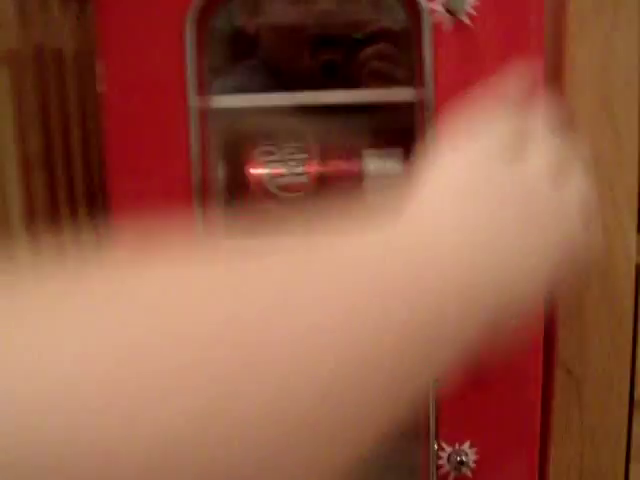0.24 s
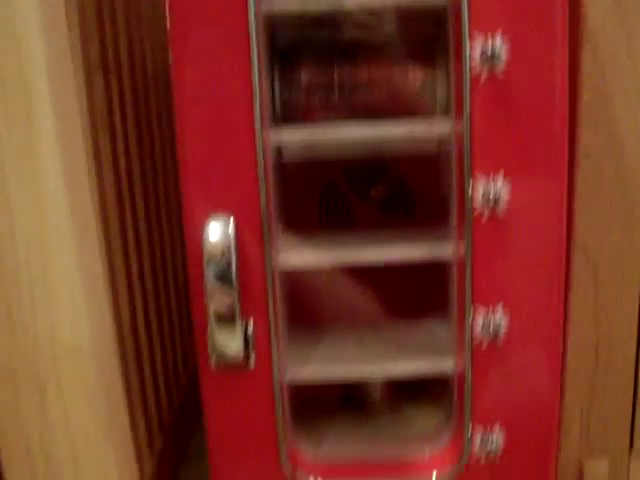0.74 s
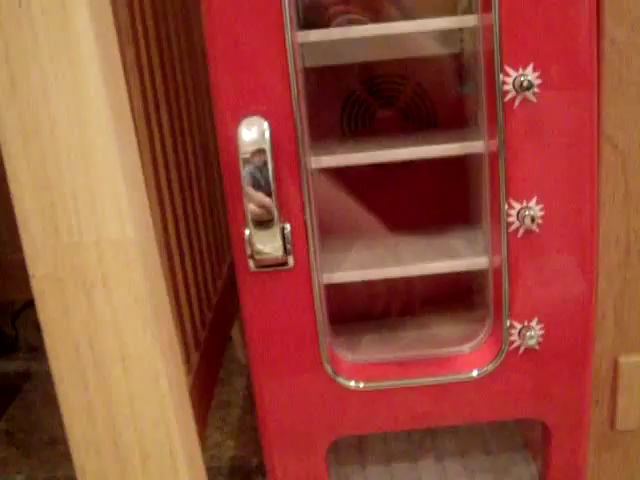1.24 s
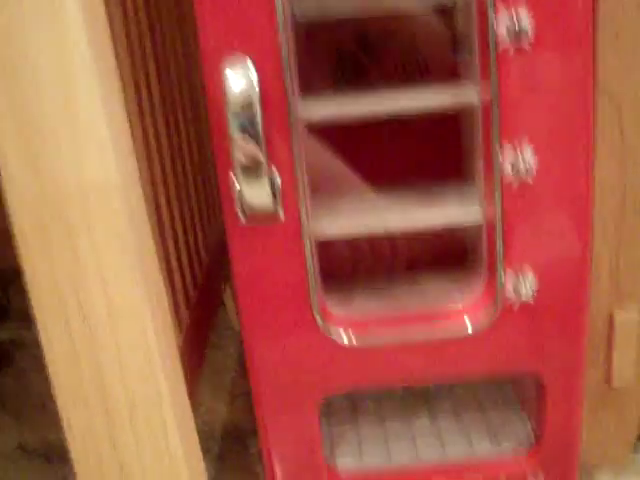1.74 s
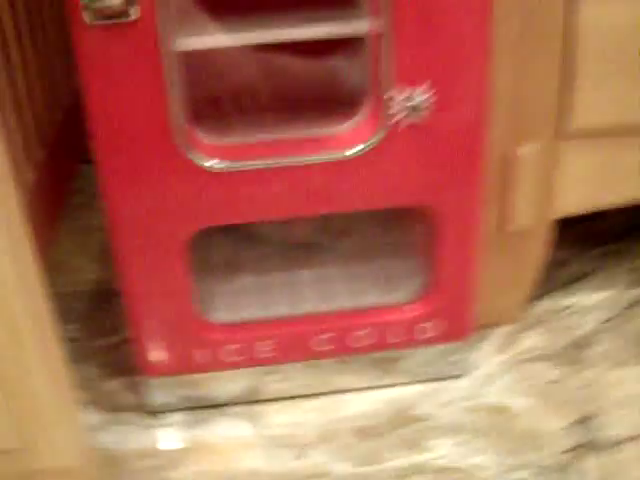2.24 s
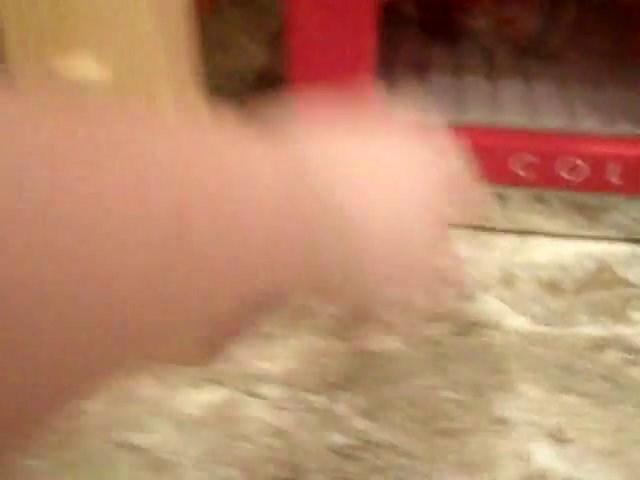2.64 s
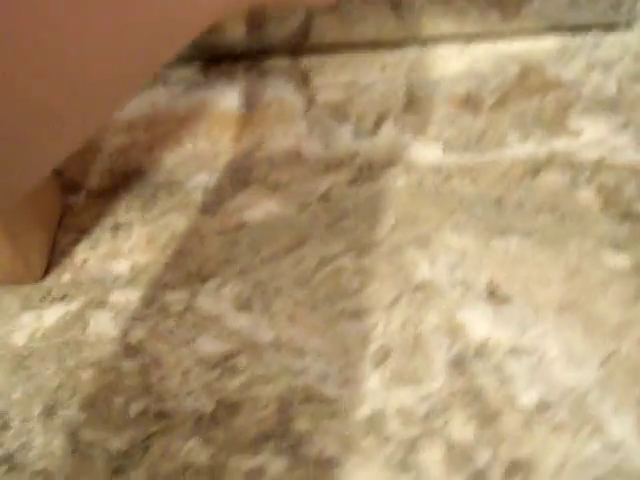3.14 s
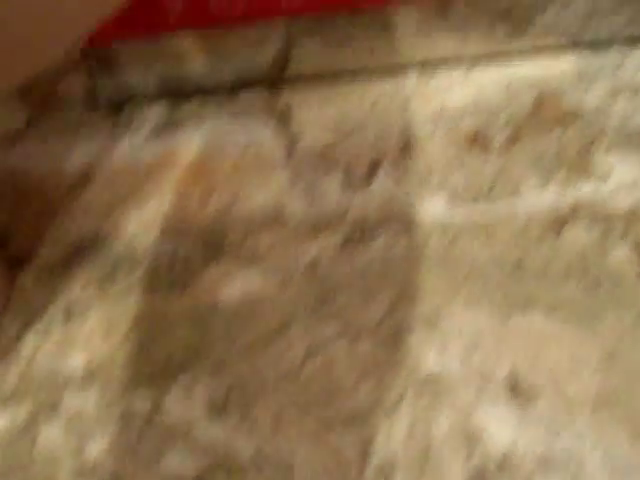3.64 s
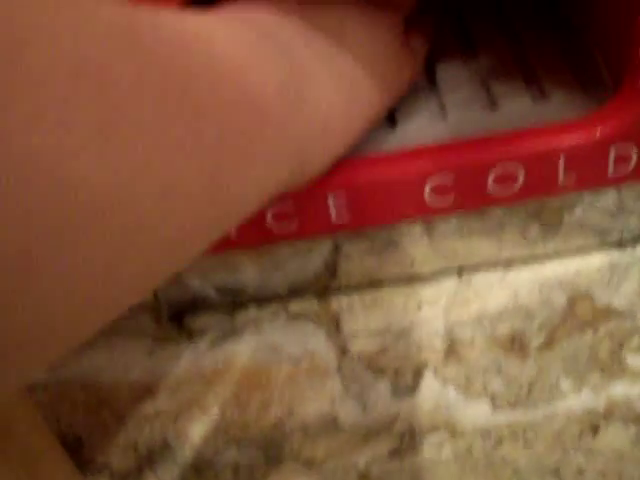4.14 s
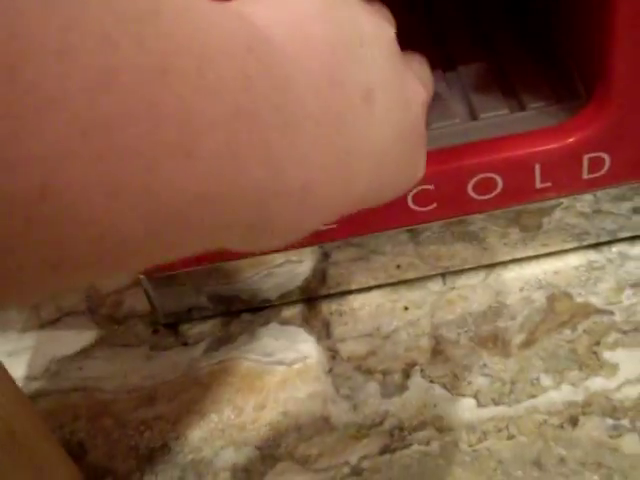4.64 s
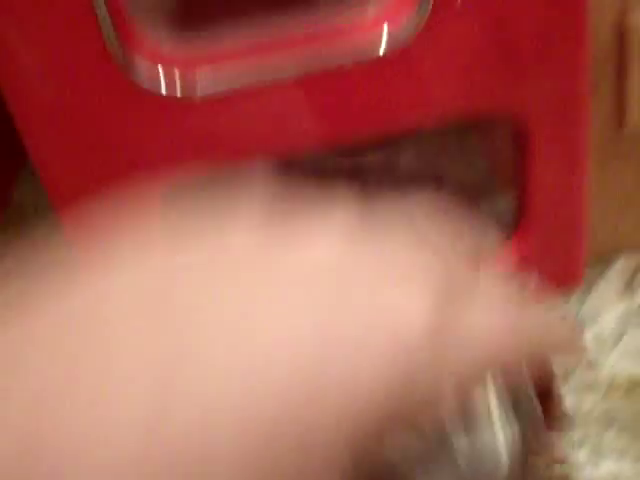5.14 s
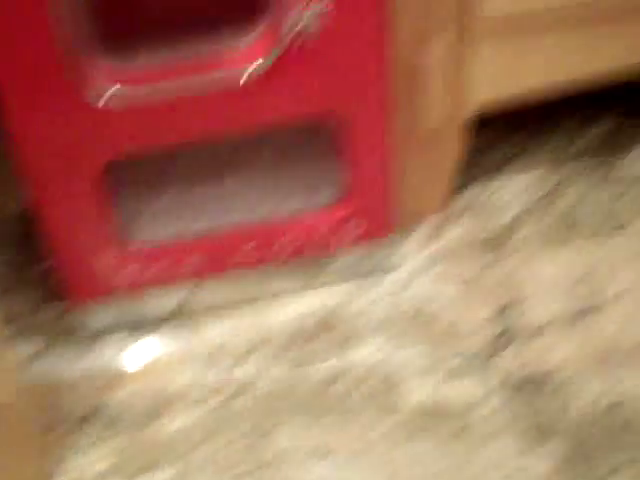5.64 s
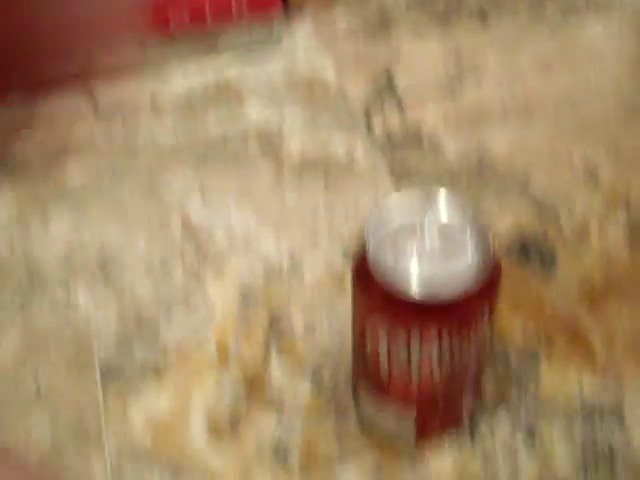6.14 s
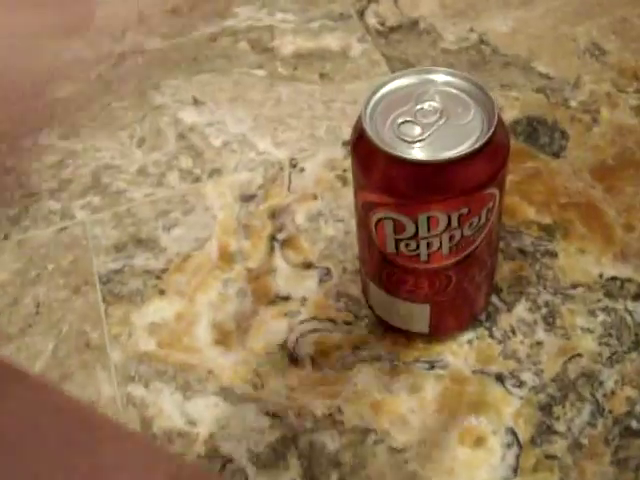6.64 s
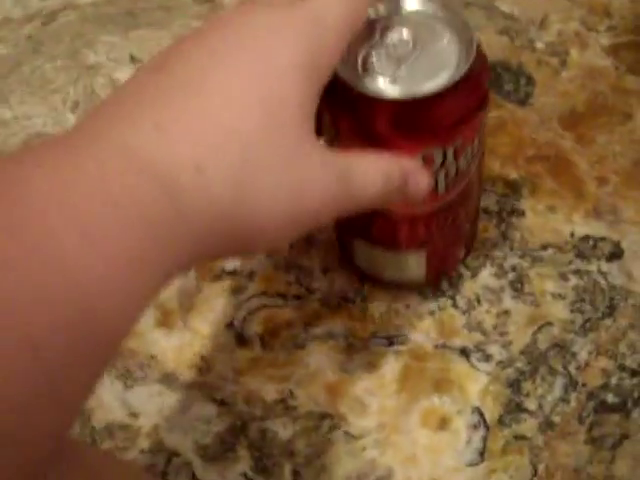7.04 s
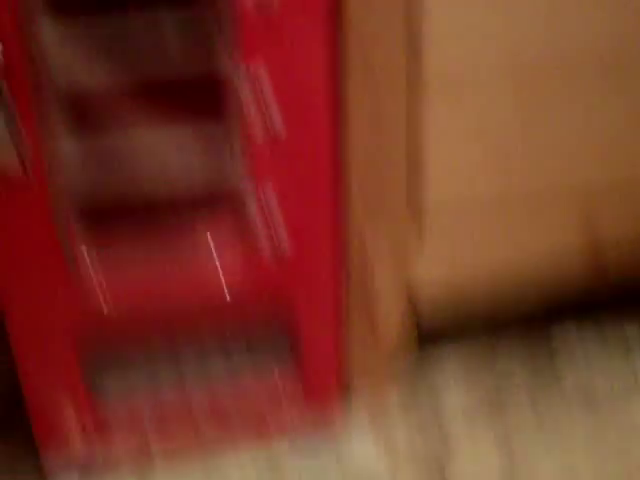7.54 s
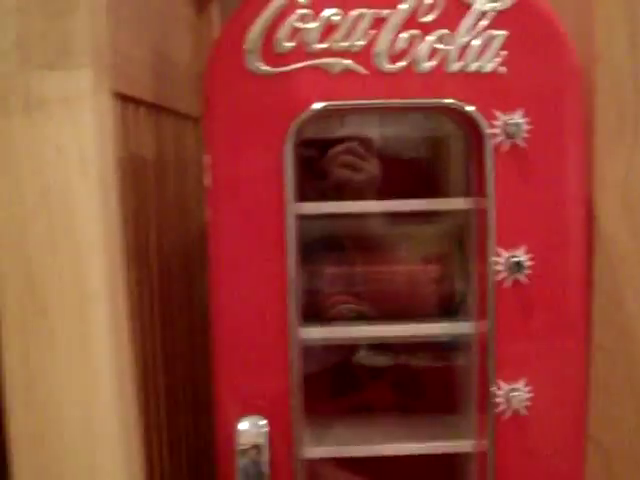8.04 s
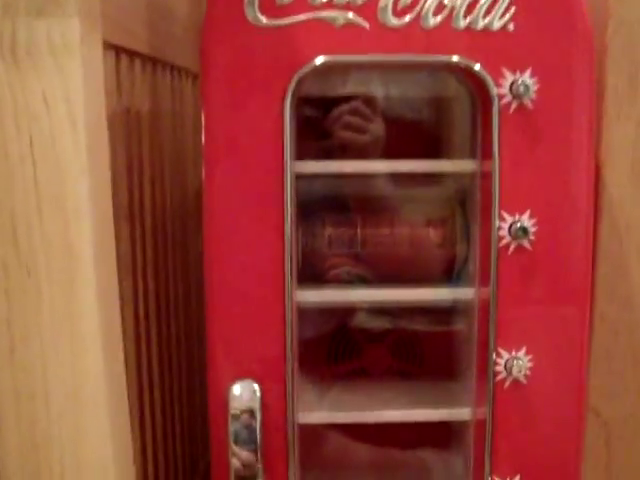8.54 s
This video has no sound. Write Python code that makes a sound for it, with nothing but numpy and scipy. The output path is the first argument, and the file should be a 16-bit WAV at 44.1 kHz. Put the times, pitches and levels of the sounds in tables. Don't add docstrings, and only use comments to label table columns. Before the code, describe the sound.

A cooling fan hums steadily around a low 290 Hz tone with soft airy wash, close up in a small, slightly echoing room. Light ticks at 0.1-0.3 s lead into a dense tumble from 0.37 to 0.85 s: a full can booms down plastic shelves with hollow, cracking, clipped blows. After a gap, it thunks into the tray at 1.26 s, bouncing and settling by 1.45. Quiet until 2.87, when a hand knocks the shell; scattered dull bumps and skin rubs continue to 4.1. Firmer tugging knocks run 4.45-5.0, then a loud clattering bang at 5.1 frees the can. At 5.55 it strikes stone with a bright, short metallic ring, rocks and seats by 5.66. A deep camera bump comes at 6.31. From 7.0 to 7.4 the rim clicks, scrapes and chirps as it lifts. Faint rustle and fan hum finish to 8.8 s.

```python
import sys
import numpy as np
from scipy import signal
from scipy.fft import rfft, irfft, next_fast_len
from scipy.io import wavfile
from scipy.ndimage import uniform_filter1d

SR = 44100
rng = np.random.default_rng(int(sys.argv[2]) if len(sys.argv) > 2 else 0)


def to_wav(sig):
    pcm = np.clip(np.atleast_2d(sig), -1, 1) * 32767
    pcm = np.round(pcm).astype(np.int16)
    wavfile.write(sys.argv[1], SR, pcm.T)


def volts_from_db(level):
    exponent = np.asarray(level, float) / 20
    return 10 ** exponent


N = 387947


def evened(x):
    return x / np.sqrt(np.mean(x ** 2) + 1e-20)


def read(points, hz):
    f, value = np.transpose(points)
    return np.interp(np.log(hz + 1), np.log(f + 1), value)


def coloured(x, points):
    size = next_fast_len(len(x))
    gain = volts_from_db(read(points, np.fft.rfftfreq(size, 1 / SR)))
    return irfft(rfft(x, size) * gain, size)[:len(x)]


def along(rows, column):
    rows = np.asarray(rows)
    return np.interp(np.arange(N) / SR, rows[:, 0], rows[:, column])


def drift(rate):
    steps = rng.standard_normal(int(N / SR * rate) + 2)
    return evened(np.interp(np.arange(N) / SR * rate, np.arange(len(steps)), steps))


def swells(rows, column):
    t = np.arange(N // 64 + 2) * 64 / SR
    slow = np.zeros(len(t))
    for row in rows:
        away = np.maximum((row[0] - t) / row[1], (t - row[0]) / row[2])
        slow += volts_from_db(row[column] - 20 * away)
    return np.interp(np.arange(N) / SR, t, slow)


def grit(per_s, spread_db):
    size = volts_from_db(spread_db * np.minimum(rng.exponential(1, N), 4)) * rng.standard_normal(N)
    return evened(size * (rng.random(N) < per_s / SR))


def patchy(x, depth_db):
    z = signal.stft(x, nperseg=512)[2]
    patches = uniform_filter1d(rng.standard_normal(z.shape), size=9, axis=0)
    patches = uniform_filter1d(patches, size=14, axis=1)
    return signal.istft(z * volts_from_db(depth_db * evened(patches)), nperseg=512)[1][:N]


def puffs(s, db, t60):
    spikes = np.zeros(N)
    spikes[np.round(np.asarray(s) * SR).astype(int) + 30] = volts_from_db(db)
    fading = signal.lfilter([1], [1, -10 ** (-3 / (t60 * SR))], spikes)
    return uniform_filter1d(fading, size=60)


def ring(x, hz, t60):
    w = 2 * np.pi * hz / SR
    r = 10 ** (-3 / (t60 * SR))
    return signal.lfilter([0, np.sin(w)], [1, -2 * r * np.cos(w), r * r], x)


def shaken(push, modes):
    return sum(volts_from_db(db) * ring(push, hz, t60) for hz, db, t60 in modes)


def struck(s, db, modes, contact_s, scatter_db, detune, focus_hz=None, damping=1):
    hz, mode_db, t60 = np.transpose(modes)
    chance = rng.standard_normal((len(s), 2, len(modes)))
    t = np.arange(SR // 2)[:, None] / SR
    out = np.zeros(N + SR)
    share_db = db[:, None] + mode_db + scatter_db * chance[:, 0]
    if focus_hz is not None:
        share_db = share_db - 11.7 * abs(np.log2(hz / focus_hz[:, None]))
    share = volts_from_db(share_db) * (-1) ** np.arange(len(modes))
    shifts = 1 + detune * chance[:, 1]
    for start, levels, shift, damp in zip(s, share, shifts, damping * np.ones(len(s))):
        fade = np.exp(-np.log(1000) * damp * t / t60) * (1 - t / t[-1])
        out[round(start * SR):][:len(t)] += (np.sin(2 * np.pi * t * hz * shift) * fade) @ levels
    pad = np.hanning(int(contact_s * SR) + 3)
    return signal.oaconvolve(out, pad / pad.sum())[:N]


# frequency in Hz, t60 in s.
ROOM_DECAY = [(60, 0.57), (250, 0.42), (1000, 0.45), (4000, 0.4)]


def room(x):
    taps = np.zeros(SR)
    at = np.arange(200, SR - 20, 20)
    taps[at + rng.integers(0, 20, len(at))] = rng.choice([-1., 1.], len(at))
    hz, t, z = signal.stft(taps, SR, nperseg=256)
    dying = volts_from_db(-60 * t / read(ROOM_DECAY, hz)[:, None])
    tail = signal.istft(z * dying, SR, nperseg=256)[1]
    return signal.fftconvolve(x, tail / np.linalg.norm(tail))[:N]


# frequency in Hz, level in dB per Hz.
AIR_WASH = [(20, -14), (49, -6.5), (110, -17.5), (183, -0.5), (230, -3), (294, -1), (390, -9), (600, -8),
            (1300, -11), (2100, -11), (3000, -25), (4000, -27), (5500, -22.5)]
# frequency in Hz, level in dB, width in Hz.
FAN_TONES = [(292, -41.5, 1.938), (315, -51.5, 4.2), (609, -58, 4), (47.7, -53, 6.8), (120, -57, 14),
             (180, -52.5, 3.4), (357, -60, 2.7), (1320, -55.5, 4.8)]
# time in s, level in dB.
FAN_DISTANCE = [(0.0, -2.5), (8.8, -3)]


def fan():
    t = np.arange(N) / SR
    wash_level = volts_from_db(-44 + drift(2.485))
    wash = wash_level * evened(coloured(rng.standard_normal(N), AIR_WASH))
    tones = np.zeros(N)
    for hz, db, width in FAN_TONES:
        level = volts_from_db(db + 2.0 + 0.3 * drift(22))
        cycles = hz * t + np.cumsum(width * drift(14)) / SR
        tones += level * np.sin(2 * np.pi * cycles)
    return wash + volts_from_db(along(FAN_DISTANCE, column=1)) * tones


# start in s, level in dB, pitch in Hz.
CAMERA_BUMPS = [
    (6.259, -30, 58.3),
    (6.283, -21, 68.4),
    (6.31, -6.5, 52.5),
    (6.513, -28, 90),
    (7.809, -41, 49),
]


def thumps():
    out = np.zeros(N)
    t = np.arange(4000) / SR
    for s, db, hz in CAMERA_BUMPS:
        turns = 2.73 * (1 - np.exp(-t * hz / 1.84))
        shape = -np.sin(2 * np.pi * turns) * np.minimum(t / 0.0008, 1) * np.exp(-t * hz / 0.64)
        out[round(s * SR):][:len(t)] += volts_from_db(db + 3.5) * shape
    return out


# peak in s, rise in s, fall in s, hiss in dB, brush in dB.
STROKES = [(.15, 0.39, 0.096, -59.5, -39), (.54, 0.092, 0.24, -41, -10.5), (.95, 0.35, 0.54, -66, -49.5),
           (1.35, 0.16, 0.21, -70, -26), (2.45, 0.45, 0.2, -39.5, -42.5), (2.7, 0.47, 0.068, -53, -80),
           (3.06, 0.14, 1, -43, -53.5), (3.53, 0.97, 0.54, -46, -32.5), (3.9, 0.27, 0.46, -49.5, -43),
           (4.31, 0.36, 0.89, -47.5, -34), (4.66, 0.32, 0.047, -38.5, -48.5),
           (4.85, 0.22, 0.15, -41, -25.5), (5.02, 0.15, 0.15, -38.5, -42.5), (5.95, 1, 0.97, -49, -66.5),
           (6.37, 0.43, 0.13, -44, -42.5), (6.8, 0.13, 0.9, -46.5, -82), (7.25, 0.066, 0.32, -45, -36),
           (7.83, 0.22, 0.19, -55, -33), (8.5, 0.62, 1, -72.5, -44.5)]
# time in s, level in dB.
SHAKE = [(0.0, -54), (0.32, -35), (0.56, -28.5), (0.8, -37), (1.2, -49), (1.35, -39), (1.9, -62.5),
         (2.4, -57.5), (2.91, -70), (3.97, -51), (4.4, -49), (4.66, -24.5), (5.0, -45), (5.9, -56),
         (6.37, -43.5), (7.1, -71), (8.1, -50), (8.8, -51)]
# frequency in Hz, level in dB per Hz.
HISS_COLOUR = [(800, -19.5), (2000, -20), (3000, 3), (4500, -1.5), (5600, 2.5)]
# frequency in Hz, level in dB per Hz.
DULL_COLOUR = [(200, -16), (400, -2), (1000, -4.5), (2000, -7.5), (3500, -23.5)]
# frequency in Hz, level in dB per Hz.
SHAKE_COLOUR = [(25, -15), (50, 3.5), (110, 13), (170, -12.5), (300, -50)]


def rustle():
    rest_hiss_db, rest_brush_db = -59, -46.5
    grains = patchy(volts_from_db(2.3 * drift(22)) * grit(6000, 1.6), 2.67)
    hiss_level = volts_from_db(5.5) * (swells(STROKES, column=3) + volts_from_db(rest_hiss_db))
    brush_level = volts_from_db(-7.0) * (swells(STROKES, column=4) + volts_from_db(rest_brush_db))
    hiss = hiss_level * evened(coloured(grains, HISS_COLOUR))
    brush = brush_level * evened(coloured(grains, DULL_COLOUR))
    rumble = volts_from_db(along(SHAKE, column=1)) * evened(coloured(rng.standard_normal(N), SHAKE_COLOUR))
    return hiss + brush + rumble


# start in s, level in dB, pitch in Hz, length in s.
SLIPS = [
    (2.937, -36.5, 2350, 0.037),
    (4.452, -34, 4720, 0.017),
    (5.054, -5, 393, 0.023),
    (7.06, -10, 2950, 0.0061),
    (7.067, -34, 400, 0.043),
    (7.249, -34, 386, 0.029),
    (7.34, -19, 2710, 0.014),
    (7.348, -36, 392, .04),
]


def squeaks():
    out = np.zeros(N)
    for (s, db, hz, length), bend in zip(SLIPS, rng.standard_normal(len(SLIPS))):
        t = np.arange(round(length * SR)) / SR
        tone = np.sin(2 * np.pi * hz * t * (1 + 0.036 * bend * t / length))
        out[round(s * SR):][:len(t)] += volts_from_db(db) * np.sin(np.pi * (t / length) ** 0.78) ** 2 * tone
    return out


def can(rows, modes, knock_db, spread):
    s, db, upper_db, drag_db, drag_s = np.transpose(rows)
    drag, bright = np.zeros((2, N))
    for start, level, lift, length in zip(s, drag_db, upper_db, drag_s):
        swell = volts_from_db(level) * np.hanning(round(length * SR))
        drag[round(start * SR):][:len(swell)] += swell
        bright[round(start * SR):][:len(swell)] += volts_from_db(lift) * swell
    rim = grit(3000, 3.2)
    scrape = drag * rim
    bright_scrape = bright * rim
    main = struck(s, db + 2.5, modes[:1], .0002, .5, .002)
    main += shaken(volts_from_db(-24) * scrape, modes[:1])
    cluster = struck(s, db + upper_db - 8.0, 3 * modes[1:], .0001, 0.8, spread)
    cluster += shaken(volts_from_db(-31.0) * bright_scrape, modes[1:])
    cluster += coloured(volts_from_db(-8.0) * bright_scrape, [(400, -20)] + CRACK_COLOUR)
    dull = struck(s, db + knock_db - 9.0, PANEL_MODES[3:] + TRAY_MODES[:2], 0.00044, 1.2, 0.038)
    dull += shaken(volts_from_db(-43.5) * scrape, PANEL_MODES[4:])
    return main + cluster + dull


# start in s, strike in dB, upper ring in dB, rim drag in dB, drag in s.
STONE_BLOWS = [
    (5.552, -1, -2, -20, 0.014),
    (5.577, -10, 0, -21, .045),
    (5.592, -20, 4, -30, .035),
    (5.634, -24, 8, -32, 0.008),
    (5.655, -28, 6, -26, .04),
]
# frequency in Hz, level in dB, t60 in s.
STANDING_MODES = [(1269, -1.5, 0.099), (2070, -11, .05), (2150, -5.5, 0.1), (2303, -7.5, 0.08),
                  (2448, -9.5, 0.091), (2700, 2.5, 0.05), (2808, -0.5, 0.086), (3050, -3.5, 0.041),
                  (3858, 0.5, 0.027), (4314, -16.5, 0.048), (4800, -6, 0.048), (5240, -11.5, 0.057)]
# frequency in Hz, level in dB, t60 in s.
WALL_RING = [(1256, -31, 1.0), (1277, -41, .5), (2120, -40, .3), (2670, -40, .35)]


def can_set_down():
    muted_s, muted_db = 5.627, -11
    muted = volts_from_db(muted_db * np.clip((np.arange(N) / SR - muted_s) * 200, 0, 1))
    ringing = muted * can(STONE_BLOWS, STANDING_MODES, knock_db=-4.5, spread=.03)
    return ringing + struck(np.array(STONE_BLOWS)[:1, 0], np.zeros(1), WALL_RING, .0005, 0, 0)


# start in s, strike in dB, upper ring in dB, rim drag in dB, drag in s.
LIFT_SCRAPES = [(7.009, -31, 0, -27, 0.025), (7.035, -33, 2, -30, 0.01), (7.044, -34, 6, -24, .012),
                (7.059, -34, 4, -48.5, .01), (7.066, -30, -16, -30, 0.059), (7.159, -36, -1.5, -30, .025),
                (7.228, -36, 3, -34, .012), (7.245, -23, -12, -23, 0.03), (7.309, -36, 0, -34, .012),
                (7.325, -27, 2, -23, .014), (7.338, -13, -3, -18, .009), (7.354, -11, -9, -24, 0.008),
                (7.362, -16, -5, -20, 0.01), (7.372, -19, -4, -22, .016)]
# frequency in Hz, level in dB, t60 in s.
HELD_MODES = [(1409, -4.5, 0.048), (2410, -8, 0.047), (2780, 5, 0.043), (2830, 4.5, 0.0075),
              (2950, 9.5, 0.01), (3800, 4.5, 0.0081), (4460, -17, 0.022), (4560, -5.5, 0.03),
              (5050, -4, 0.039)]


def can_lifted():
    return can(LIFT_SCRAPES, HELD_MODES, knock_db=-15.5, spread=.04) + squeaks()


# start in s, panel blow in dB, struck spot's pitch in Hz, tray blow in dB,
# crack in dB.
FALL_BLOWS = [(0.086, -24, 153, -31.5, -36), (0.221, -22.5, 143, -34, -49),
              (0.273, -24.5, 157, -32.5, -29.5), (0.283, -31.5, 142, -23.5, -24.5),
              (0.294, -13, 470, -11.5, -8.5), (0.375, -2, 163.6, -16.5, -23.5),
              (0.461, 4.5, 234, -1.5, -11), (0.476, -4, 315, -4.5, -15), (0.527, 4.5, 469, 2.5, -4.5),
              (0.545, 0, 184, -1.5, -7), (0.561, 1.5, 115, -6.5, -21.5), (0.577, -1.5, 120, -6, -15.5),
              (0.6, -10.5, 243, -8.5, -28.5), (0.647, 1, 302, -8.5, -13.5), (0.666, -20.5, 265, -23.5, -28),
              (0.725, -5.5, 175, -11, -19), (0.772, -8, 175, -20, -32), (0.8, -16.5, 178, -30, -57),
              (0.839, -26.5, 171, -46, -42.5)]
# s, dB, Hz, dB, dB.
LAND_BLOWS = [
    (1.139, -18, 176, -35.5, -53.5),
    (1.189, -15.5, 162, -19.5, -34),
    (1.26, 3.5, 474, -1, -4.5),
    (1.27, 3, 194.6, -1.5, -27),
    (1.292, -2.5, 198, -12, -28.5),
    (1.321, -9, 189.4, -13.5, -22.5),
    (1.345, -7.5, 175, -22.5, -38),
    (1.372, -13, 183, -27, -56),
    (1.431, -26, 141, -25.5, -41.5),
]
# s, dB, Hz, dB, dB.
REACH_BLOWS = [(2.872, -5.5, 139, -17.5, -27.5), (2.888, -11.5, 158, -30, -26),
               (2.929, -26, 209, -37.5, -25.5), (2.989, -9.5, 282, -23, -30.5),
               (3.071, -48, 312, -45, -36.5), (3.323, -12.5, 183.5, -28, -35.5), (3.437, -6, 202, -15, -18),
               (3.458, -12, 185, -32, -54), (3.59, -26.5, 175, -33, -35.5), (3.644, -17.5, 252, -27, -36.5),
               (3.692, -18.5, 187, -23.5, -26.5), (3.744, -15, 302, -17, -17),
               (3.821, -12, 506, -7.5, -33.5), (3.925, -6.5, 194, -14, -26.5), (3.959, -9.5, 178, -20, -54),
               (4.024, -20.5, 227, -27, -36), (4.072, -10.5, 433, -15, -27.5),
               (4.089, -11, 387, -26, -53.5)]
# s, dB, Hz, dB, dB.
PULL_BLOWS = [(4.453, -32, 476, -43.5, -40), (4.485, -8, 266, -17, -25), (4.549, -12.5, 163, -20.5, -17),
              (4.604, -9, 293, -18.5, -20), (4.68, -2.5, 137.5, -19.5, -22.5),
              (4.784, -3.5, 274, -9.5, -16), (4.818, -25, 285, -39, -37), (4.985, -19, 143.5, -28.5, -27.5),
              (5.105, 5, 120, -3, -11), (5.112, 3, 305, -6, -3), (5.123, 4, 128, 1, -16),
              (5.141, 3, 156.5, -16, -37), (5.153, -5, 169, -13, -33.5), (5.201, -9.5, 184, -38, -48),
              (5.455, -26, 294, -53, -29.5)]
# s, dB, Hz, dB, dB.
TOUCHES = [
    (1.234, -8, 201.6, -22.5, -53),
    (3.73, -23, 279, -26, -39),
    (3.912, -19, 203, -24, -41.5),
    (4.773, -24, 296, -24, -32),
    (5.038, -5, 377, -20.5, -24),
    (5.058, -5, 439, -11, -15.5),
    (5.067, -11, 424, -12.5, -32.5),
]
# peak in s, rise in s, fall in s, rumble in dB, rattle in dB.
ROLLS = [(.1, 0.13, 0.17, -45, -40), (.33, 0.082, 0.095, -40, -22.5), (.56, 0.15, 0.07, -1.5, -30.5),
         (.64, 0.089, .18, -9, -20), (1.31, 0.12, 0.13, -9.5, -36.5), (2.87, 0.06, 0.18, -43, -47),
         (3.06, 0.63, 0.94, -40.5, -49.5), (3.55, 0.94, 0.4, -45, -43.5), (3.75, 0.25, 0.15, -29.5, -48.5),
         (3.94, 0.058, 0.23, -24, -46), (4.15, 0.45, 0.71, -42, -44.5), (4.53, 0.17, 0.24, -29.5, -61),
         (5.05, 0.14, 0.088, -26, -33), (5.35, 0.1, 0.11, -49.5, -42)]
# start in s, level in dB.
FEET_ROCKS = [
    (2.887, -17),
    (3.46, -17),
    (3.743, -17.5),
    (3.932, -16.5),
    (4.079, -16.5),
    (4.499, -20),
    (5.0, -13),
    (4.678, -15),
    (5.136, 0.5),
]
# frequency in Hz, level in dB, t60 in s.
BOOM_MODES = [(47.5, -20, 0.03), (67.7, -0.5, 0.2), (90, -1.5, 0.1), (123.4, 2, 0.15)]
# frequency in Hz, level in dB, t60 in s.
PANEL_MODES = [(149.7, -2, 0.053), (175, -1.5, 0.11), (241.2, -5, 0.09), (285, -6, 0.085),
               (314, -1.5, 0.075), (379.6, -7, 0.074), (446.2, -7.5, 0.11)]
# frequency in Hz, level in dB, t60 in s.
TRAY_MODES = [(499.3, -1, 0.072), (593, -5, 0.057), (685, 1, 0.044), (724.3, -4.5, 0.089),
              (870, -0.5, 0.039), (963, -5.5, 0.12), (1197, -3.5, 0.068), (1433, -5, 0.059)]
# frequency in Hz, level in dB.
CRACK_COLOUR = [(1500, 0.5), (1700, 4.5), (2300, 2.5), (3000, 1), (4000, -3), (5500, -3.5)]


def cabinet():
    hand_s, rebound_s, rebound_db = 2.5, .0068, -9
    blows = FALL_BLOWS + LAND_BLOWS + REACH_BLOWS + PULL_BLOWS + TOUCHES
    s, panel, spot_hz, tray, crack = np.transpose(blows)
    held = s > hand_s
    boom = np.where(held, -13.5, -11.5) + panel - 1.5 * np.log2(spot_hz / 200)
    panel = panel + 0.65 * np.maximum(panel + 7, 0)
    rumble = swells(ROLLS, column=3) * grit(700, 2.7)
    rattle = swells(ROLLS, column=4) * grit(1500, 2.9)

    low = struck(s, boom + 0.68, BOOM_MODES, 0.0044, 5.62, 0.053, np.where(held, 64., 116.))
    low += shaken(volts_from_db(-46) * rumble, BOOM_MODES)
    low += struck(s, panel + 0.5, PANEL_MODES, 0.0017, 3.0, 0.029, spot_hz, np.where(held, 1.5, 1.1))
    low += shaken(volts_from_db(-29.5) * rumble, PANEL_MODES)
    low += shaken(volts_from_db(-35.5) * puffs(*np.transpose(FEET_ROCKS), 0.0054), BOOM_MODES[:3])

    mid = struck(s, tray + 1.2, TRAY_MODES, 0.0008, 3.05, 0.0625, damping=np.where(held, 1.6, 1))
    mid += shaken(volts_from_db(-28.5) * rattle, TRAY_MODES)

    burst = puffs(s, crack + 3.5, .01)
    burst += puffs(s, crack + 5, 0.036)
    burst += puffs(s, crack - np.where(held, 9., .1), 0.11)
    snap = burst * rng.standard_normal(N) + volts_from_db(2.0) * rattle
    sharp = volts_from_db(-1.5) * (mid + coloured(snap, CRACK_COLOUR))
    rebound = volts_from_db(rebound_db) * np.roll(sharp, round(rebound_s * SR))

    buzz = puffs(s, tray - np.where(held, 6., -1.5), 0.15) * grit(4000, 4.5)
    return low + sharp + rebound + coloured(buzz, DULL_COLOUR)


def scene():
    box, down, held = cabinet(), can_set_down(), can_lifted()
    wet = room(volts_from_db(-12.5) * box + volts_from_db(-12.5) * down + volts_from_db(-11.5) * held)
    return (box + down + held + wet + thumps() + fan() + rustle())[None]


def low_pass(x):
    return signal.sosfilt(signal.butter(12, 16800, fs=SR, output="sos"), x)


# frequency in Hz, gain in dB.
CAMERA_BAND = [(10, -30), (35, 0), (2960, 0), (3150, -17), (3370, -60), (3550, -22), (3780, 0), (5150, 0),
               (5400, -14), (5520, -35), (5600, -90)]


def record(dry):
    input_limit, playback_limit, knee, playback_gain = 1.0, .995, 20, 1.06
    clipped = np.clip(dry[0], -input_limit, input_limit)
    band = coloured(clipped, CAMERA_BAND) / playback_limit
    rounded = playback_gain * band / (1 + abs(band) ** knee / 3) ** (1 / knee)
    mix = np.clip(rounded, -1, 1)[None] * playback_limit
    return low_pass(mix)


dry = scene()
out = record(dry)
to_wav(out)
```